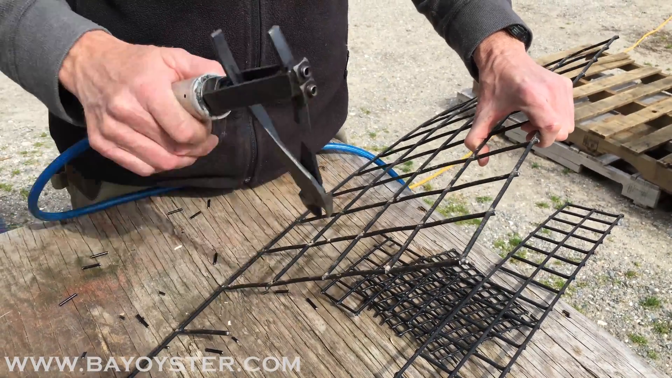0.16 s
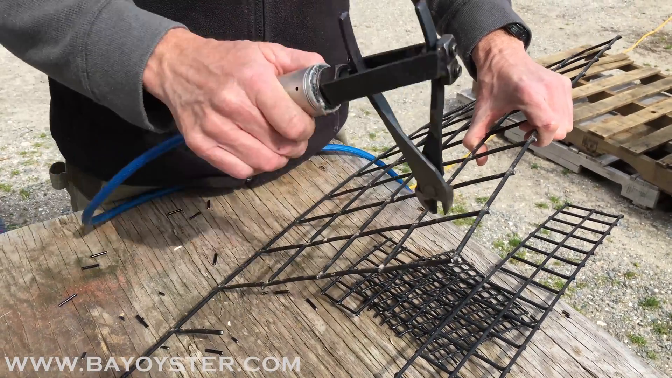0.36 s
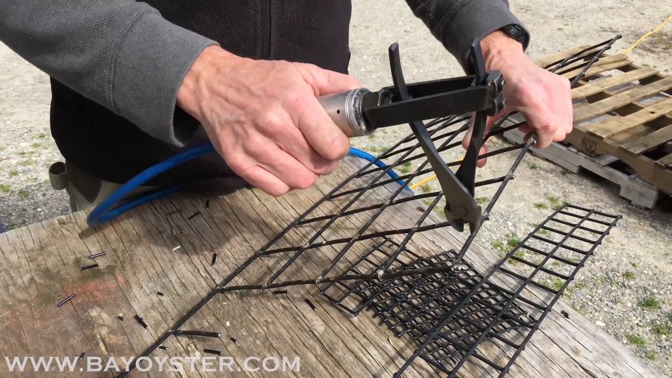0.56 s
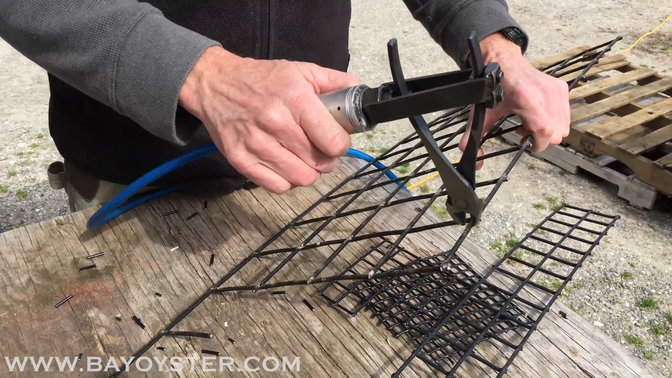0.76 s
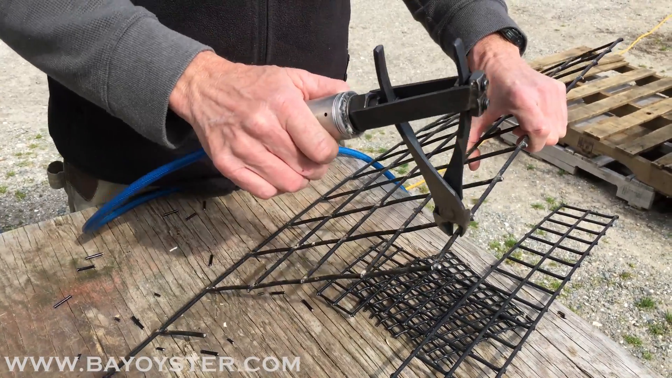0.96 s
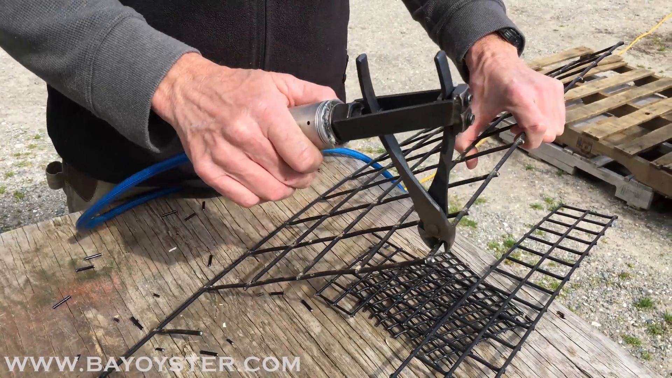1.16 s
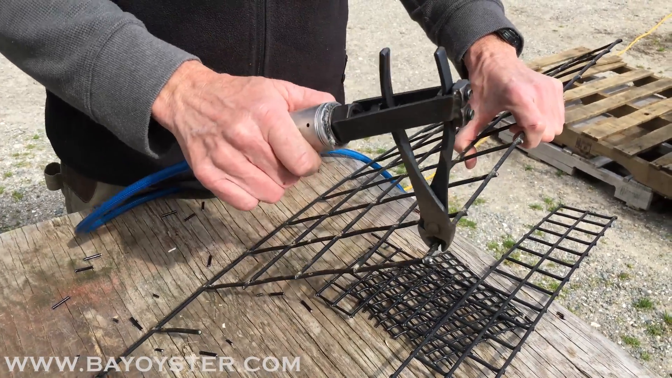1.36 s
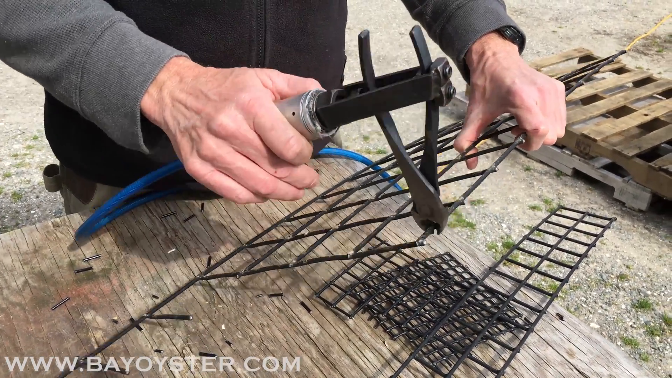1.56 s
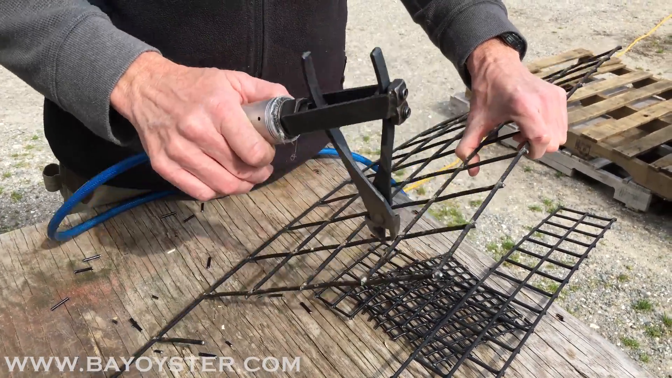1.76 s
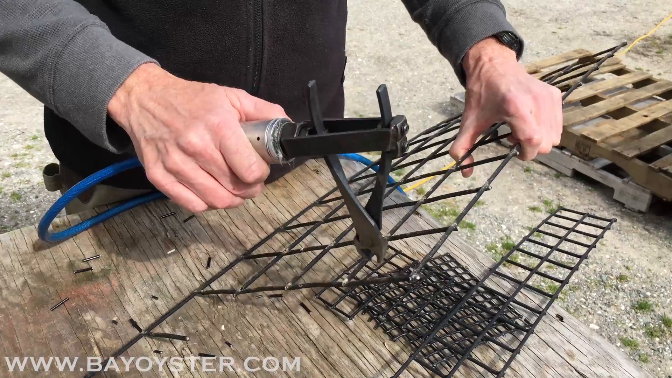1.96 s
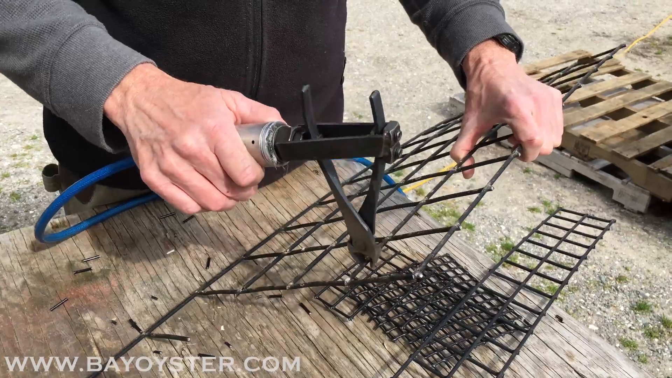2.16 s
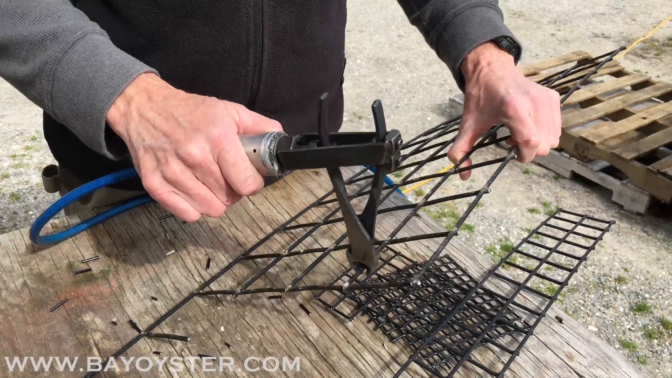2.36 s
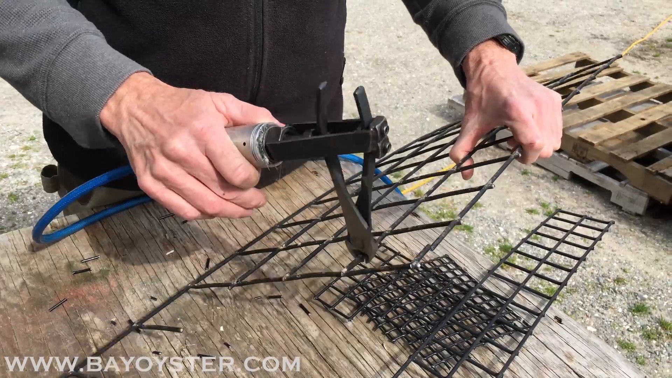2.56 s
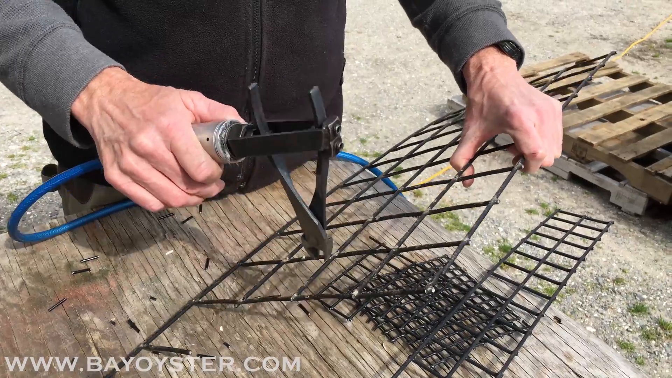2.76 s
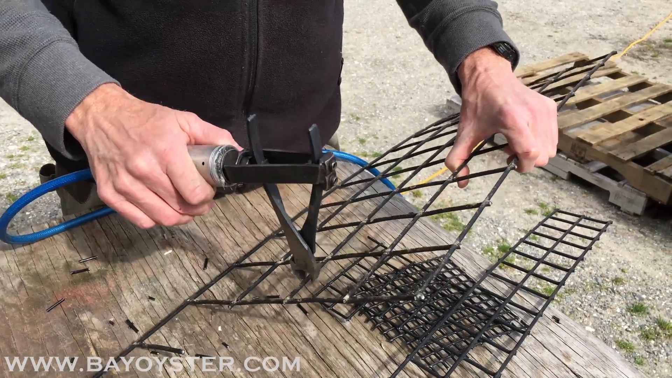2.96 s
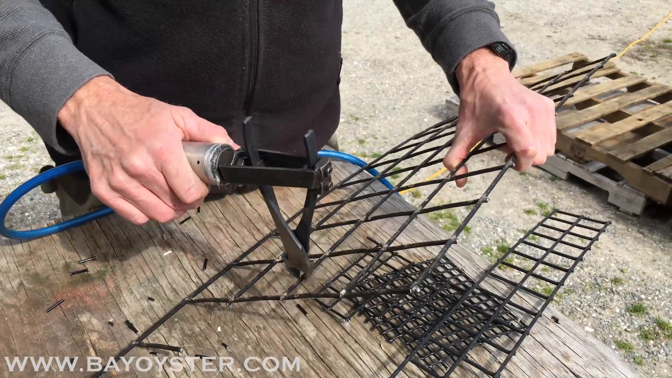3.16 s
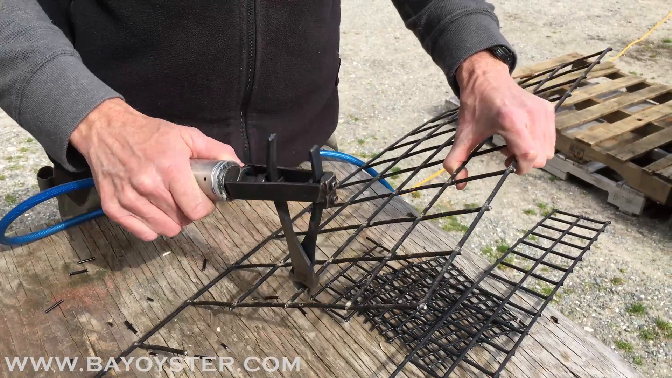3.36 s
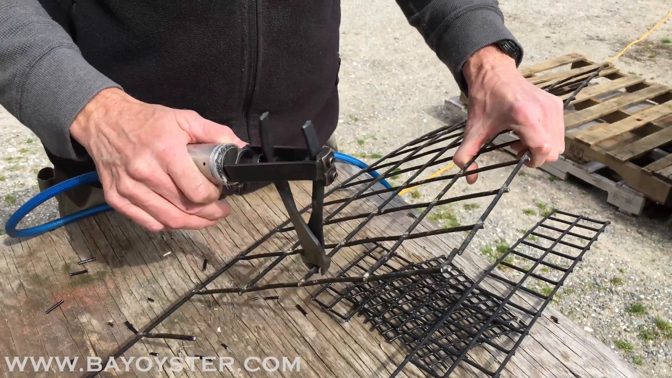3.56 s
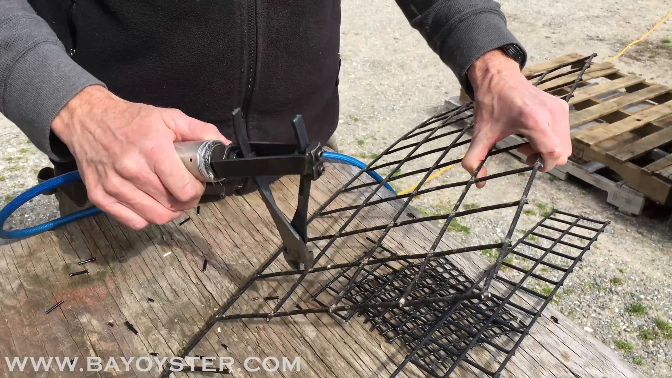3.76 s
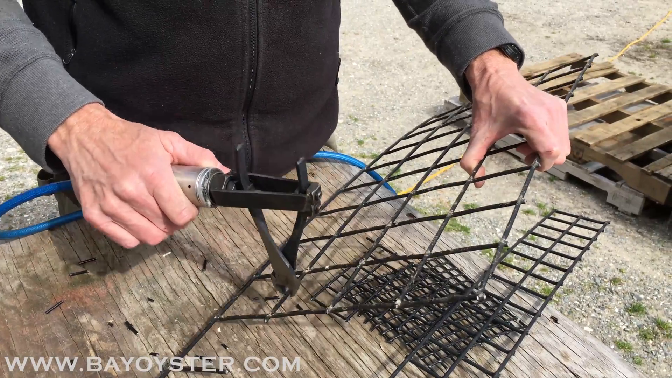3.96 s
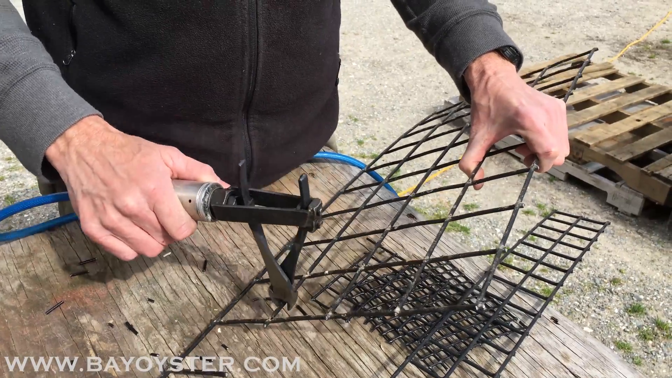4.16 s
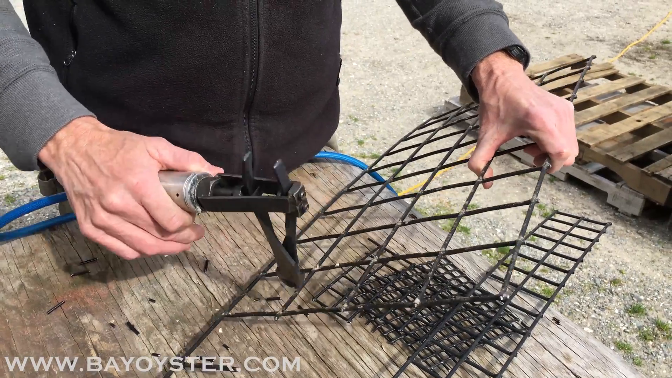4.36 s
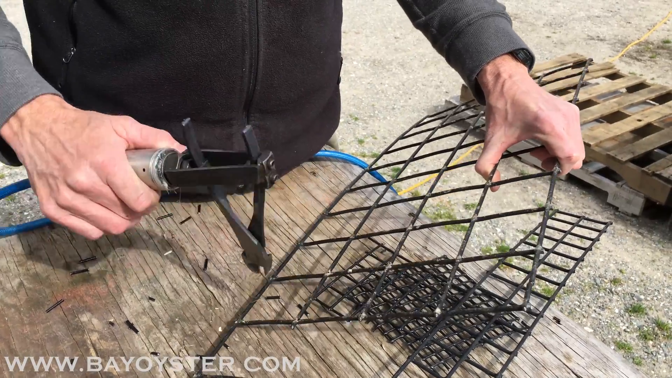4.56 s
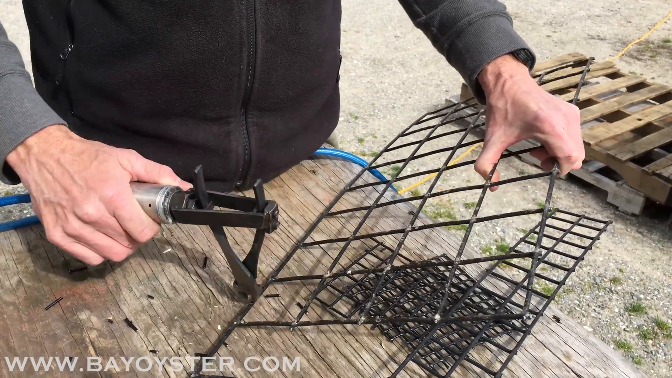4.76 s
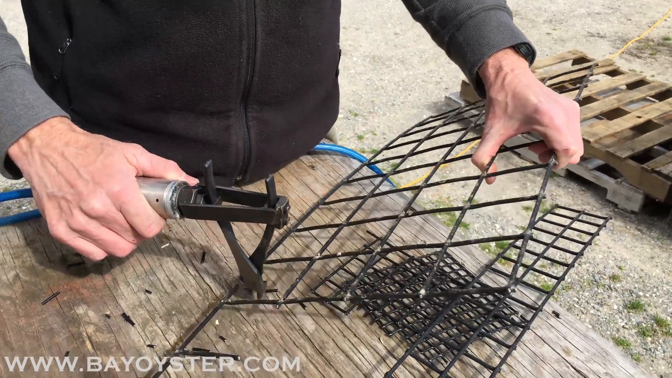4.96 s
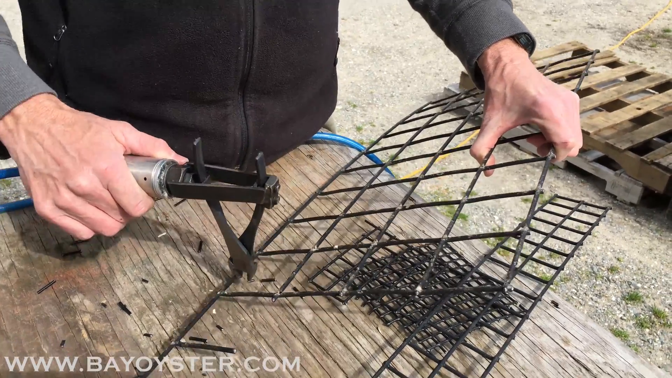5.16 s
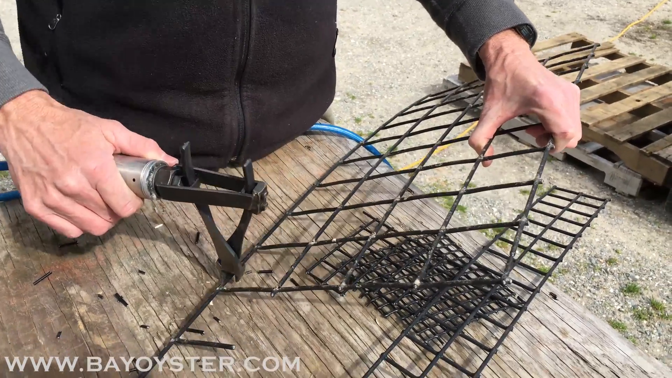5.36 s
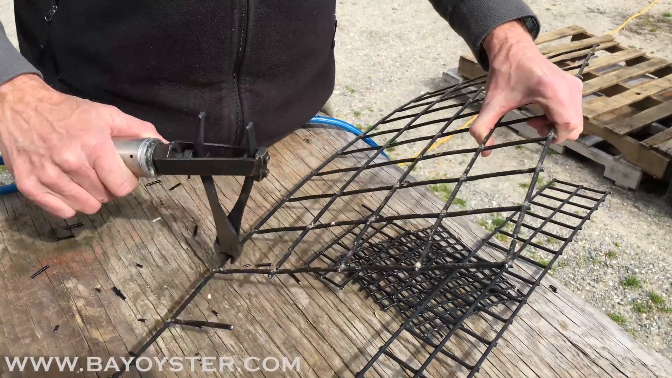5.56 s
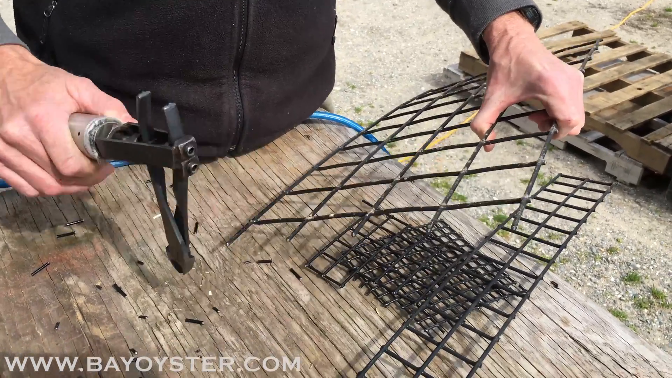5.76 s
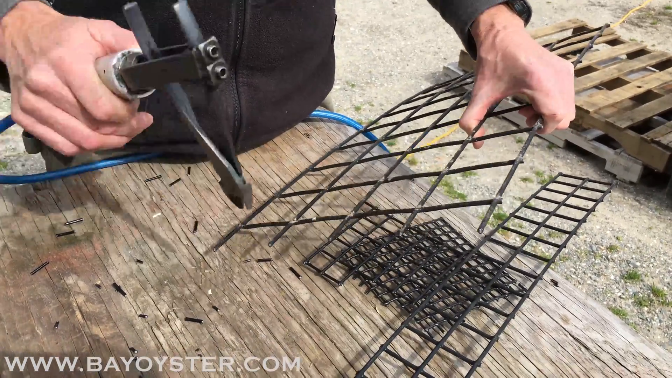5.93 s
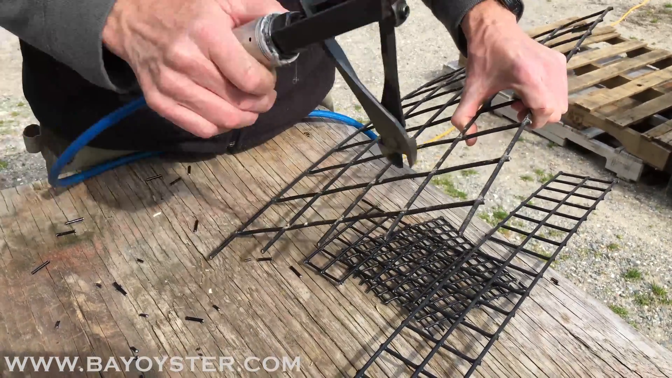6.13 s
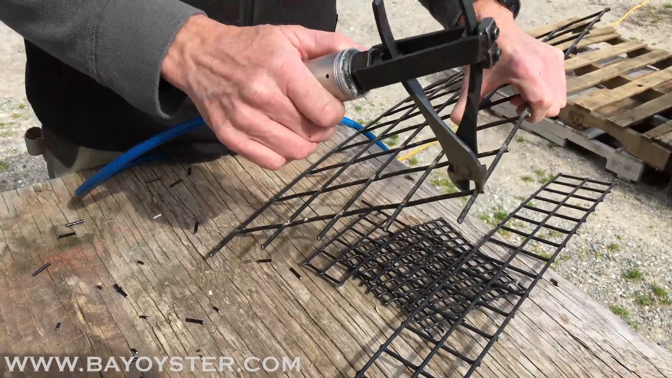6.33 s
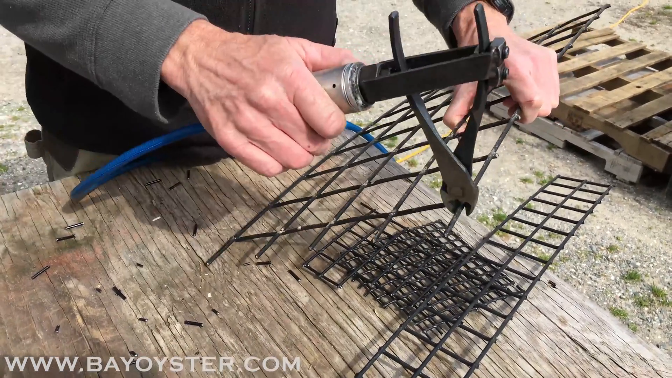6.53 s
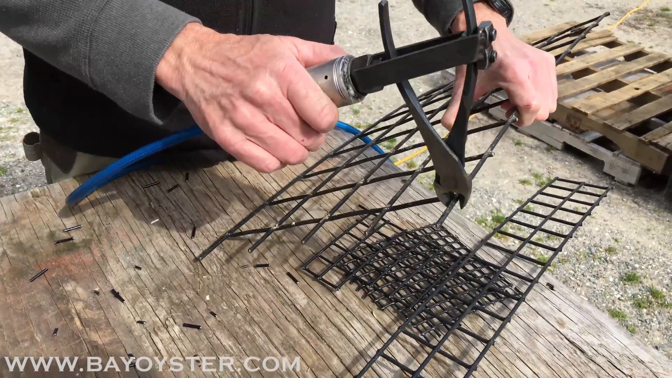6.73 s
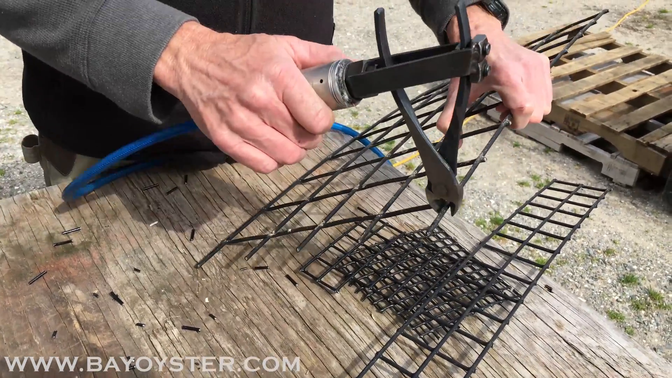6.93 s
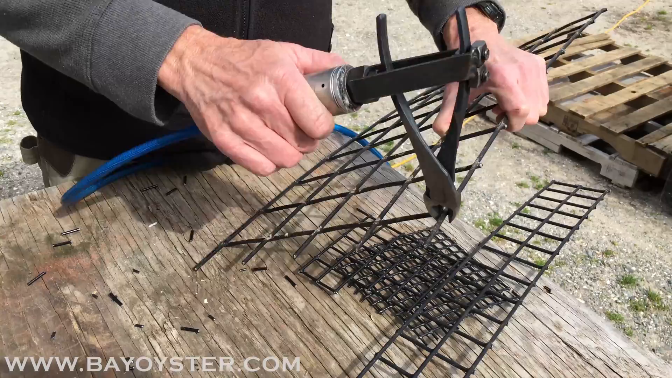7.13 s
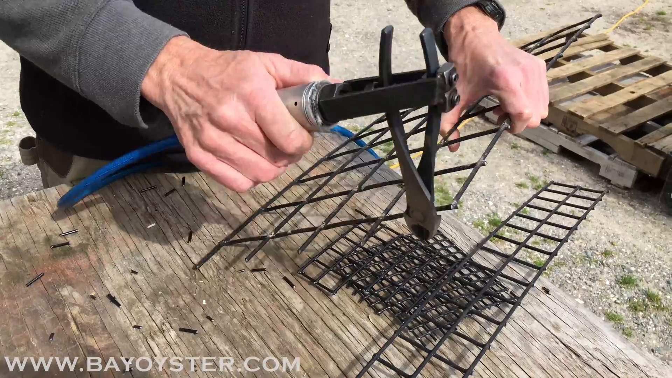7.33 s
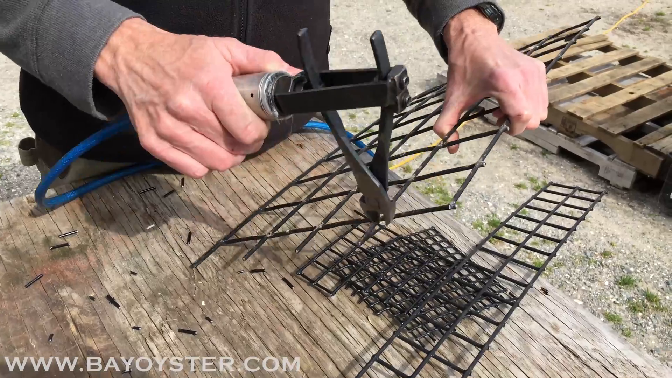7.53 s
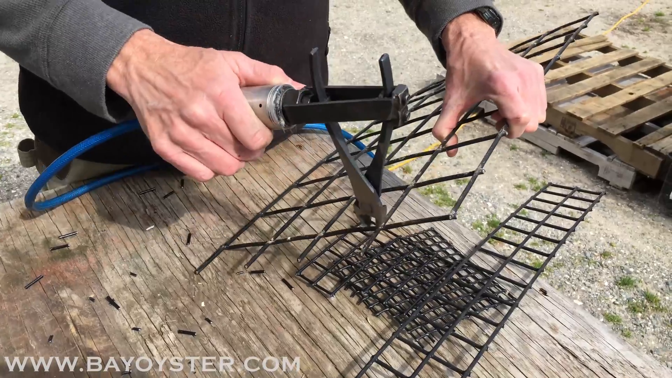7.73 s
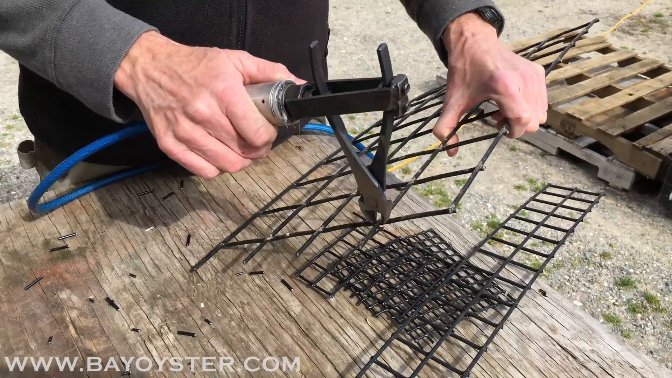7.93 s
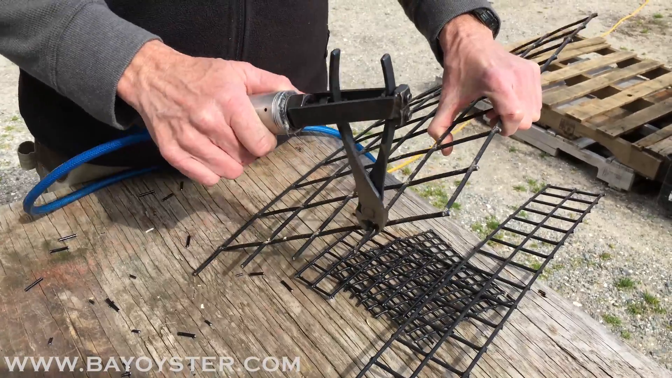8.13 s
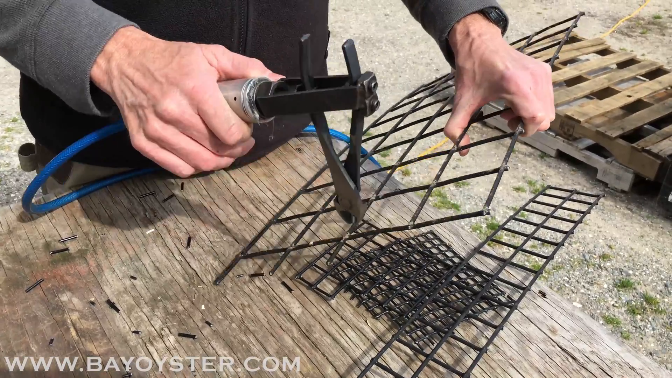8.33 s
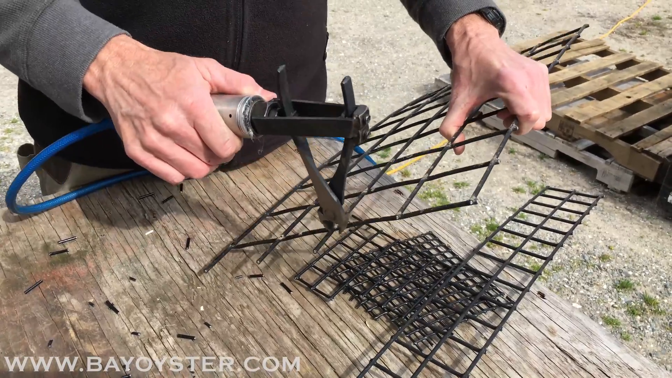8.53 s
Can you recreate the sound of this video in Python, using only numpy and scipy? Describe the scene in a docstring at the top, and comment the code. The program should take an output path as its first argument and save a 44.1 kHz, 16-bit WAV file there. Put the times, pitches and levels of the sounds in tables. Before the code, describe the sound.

Seven loud metallic bite-and-snap cuts, each answered by a short pneumatic blast, with light wire mesh clinks on wood and a faint distant engine.

```python
"""Outdoors, close by: air-powered cutters finish a vent, air seeps from the tool, wire squeaks in its jaws.
Then seven wires of a steel mesh are cut: ticks, jaws bite (noise, clamped modes), wire snaps, steel rings.
After each cut the jaws clatter open, the cylinder blasts and drains (coloured noise), the piston clicks home.
Between cuts the mesh bounces, shivers and drags on a wooden bench (modes, noise) and air hisses faintly.
Throughout: open air and low rumble (coloured noise), a distant engine (wavering harmonics)."""
import sys
import numpy as np
from scipy import signal
from scipy.fft import rfft, irfft
from scipy.io import wavfile
from scipy.ndimage import uniform_filter1d, minimum_filter1d

SR = 44100
rng = np.random.default_rng(int(sys.argv[2]) if len(sys.argv) > 2 else 0)


def to_wav(s):
    """Save 16-bit WAV."""
    ch = np.atleast_2d(s).T  # columns
    pcm = np.round(np.clip(ch, -1, 1) * 32767)  # PCM
    wavfile.write(sys.argv[1], SR, pcm.astype(np.int16))


N = 383537  # samples

# Table levels are relative; the functions add fixed trims.
# jaws hit the wire: (time [s], crack [dB], jaw clank [dB], thump [dB])
BITES = [(1.5185, -3.5, -20.5, -24), (2.5351, -4, -12, -29), (3.5235, 0.5, -38, -19),
         (4.3743, -0.5, -18.5, -22), (5.7375, 2.5, -12.5, -16.5), (7.346, 0, -14, -29),
         (8.304, -4, -9.5, -25)]
# wire parts: (time [s], crack [dB], ring [dB], thump [dB])
SNAPS = [(1.5576, -3.5, -17, -21), (2.5718, -3.5, -20.5, -22), (3.559, -3, -16.5, -22.5),
         (4.4113, -5, -13, -23), (5.7758, -4, -15, -15), (7.3881, -4.5, -15, -28),
         (8.3462, -5.5, -18.5, -25.5)]
# trigger released: (time [s], air blast [dB], jaw clatter [dB], thump [dB], piston stroke [dB])
VENTS = [(-.035, -19.5, -34, -21, -26), (1.654, -6, -1.5, -11, -22.5), (2.669, -7, -7.5, 1.5, -20.5),
         (3.655, -5.5, -5.5, -6, -19), (4.494, -8.5, -5.5, -7.5, -19.5), (5.884, -5, -6.5, -4, -18),
         (7.5, -5.5, 1, 2.5, -19.5), (8.428, -8, -7.5, -0.5, -21.5)]
# wire rubs in the jaws: (time [s], length [s], level [dB], tilt [dB/octave])
SQUEAKS = [(0.643, .14, -71.5, 11.5), (6.959, .21, -58.5, -5.5)]
# mesh lands: (time [s], clink [dB], grid pitch [Hz], boards [dB], wire tick [dB],
#              bounces [count, rounded; -1 = shiver only], gap between contacts [s])
LANDINGS = [(0.85, -53, 593, -49.5, -51, 0, 0), (0.905, -31, 984, -33, -37, 2, .027),
            (1.061, -44, 643, -41, -52.5, 2, .028), (1.826, -38, 643, -46, -46, 3.5, .0245),
            (2.068, -39, 791, -35, -37.5, 0, 0), (2.124, -45.5, 582, -40, -42.5, -0.5, 0),
            (2.276, -59.5, 654, -43.5, -69, 0.5, 0), (2.356, -53, 640, -43.5, -55, 0.5, .022),
            (2.852, -36, 623, -44.5, -44.5, 4, .0245), (3.054, -36, 639, -34.5, -41, 1, .025),
            (3.841, -31.5, 876.4, -40, -43.5, 3.5, .029), (4.05, -35.5, 850, -36.5, -70, 3, .03),
            (4.582, -38.5, 992, -39, -28.5, 0, 0), (4.756, -38.5, 950, -56, -60, 0.5, .035),
            (4.891, -44, 904, -40.5, -55.5, 1.5, .012), (4.967, -48, 980, -45, -58.5, 1.5, .038),
            (5.394, -40.5, 885, -38, -67, 0, 0), (5.853, -26, 876, -39, -45.5, -0.5, 0),
            (5.861, -24, 1051, -25, -12, -1, 0), (6.105, -33, 620, -28.5, -31, -0.5, 0),
            (6.723, -54, 598, -40, -49.5, 0.5, 0), (7.139, -73.5, 588, -48.5, -51.5, 0, 0),
            (7.185, -75, 588, -58.5, -56, 0, 0), (7.698, -42, 880, -71.5, -53.5, 0, 0),
            (7.715, -40.5, 937, -68, -36, 1.5, .024), (7.777, -49, 1020, -69, -54, 2.5, .037),
            (7.97, -59, 1020, -66, -62.5, 1.5, .011), (8.478, -11, 721, -43.5, -18, 1, 0),
            (8.612, -42.5, 642.3, -76, -81.5, -0.5, 0), (8.654, -49.5, 1124, -61.5, -51, 2, .012)]
# mesh dragged over the boards: (time [s], scrape [dB], boards [dB], length [s])
DRAGS = [(0.681, -56, -43.5, 0.073), (1.361, -64, -47, 0.055), (3.304, -50.5, -46, 0.0384),
         (3.434, -50, -44, 0.047), (4.618, -35, -40.5, 0.056), (5.974, -29.5, -33, 0.2),
         (6.168, -53, -43, .19), (7.742, -67, -62, .24), (8.243, -71, -42.5, .055)]
# air seeps past the valve: (start [s], end [s], level [dB])
LEAKS = [(0.098, 0.778, -69), (2.237, 2.412, -66.5), (3.105, 3.43, -68), (3.977, 4.199, -69.5),
         (4.713, 5.047, -68.5), (6.05, 6.669, -68), (7.979, 8.156, -70)]
# low rumble swells and sinks: (time [s], level [dB])
RUMBLE_LEVEL = [(0.0, -67), (1.5, -52), (1.94, -60.5), (2.57, -48), (2.98, -58.5), (3.51, -47.5),
                (3.85, -55.5), (4.43, -41.5), (4.6, -55), (5.52, -55), (5.72, -51), (6.66, -51.5),
                (6.85, -57.5), (7.46, -53.5), (7.68, -68), (7.99, -62.5), (8.31, -50.5), (8.7, -70)]
# distant engine: (time [s], firing rate [Hz], level [dB])
ENGINE = [(0, 120.7, -67), (.8, 120.7, -55.5), (1.9, 117.4, -55), (2.302, 117.4, -52), (3.299, 115.7, -50),
          (4.3, 112, -49), (4.799, 101.9, -55), (5.3, 112.3, -46.5), (6.499, 116.1, -49),
          (7.1, 109.4, -60.5), (7.751, 103.6, -50.5), (7.95, 104.5, -49), (8.118, 109, -35.5),
          (8.28, 113.9, -43), (8.7, 119, -60.5)]

# Modes: (frequency [Hz], level [dB], t60 [s])
# jaws clamped on the wire
CLAMPED_MODES = [(1715, -4, 0.019), (2050, -0.5, 0.027), (5800, -10.5, 0.065), (8210, -2.5, 0.02)]
# cutter steel, ringing free
STEEL_MODES = [(1654, -18, 0.083), (1892.6, -10.5, 0.038), (1940, -2, 0.092), (2027, -15.5, .05),
               (4230, -25, 0.059), (5470, -18, 0.071), (6340, -13, 0.086), (7639, -24.5, .072),
               (8974, -21, .079), (9450, -16.5, 0.074), (12310, -15, .058)]
# cylinder and handles
HOUSING_MODES = [(438, -1, .07), (563.7, 1, 0.045), (895.4, 0.5, 0.091), (1039.7, -3.5, 0.055),
                 (1448, -7.5, .09), (2080, -2.5, 0.041), (3235, -4.5, 0.086), (4280, -4, .08),
                 (5250, -4, 0.088), (5800, -8, 0.17), (6100, -2.5, .13), (6640, -3.5, .13), (9330, -5, .1),
                 (11140, -4, 0.11), (12594, -8, 0.11)]
# mesh lying on the bench
MESH_MODES = [(960, -0.5, .045), (1348, -20, 0.027), (1690, -1.5, 0.029), (2176, -6, 0.042),
              (2456, -7, 0.024), (3453, -8, 0.021)]
# bench boards
BOARD_MODES = [(145.7, -5, 0.11), (213.6, 4, 0.12), (273.5, -4, 0.03), (333, -15.5, 0.02)]
# tones of the squeak: (frequency [Hz], level [dB])
SQUEAK_TONES = [(1723, -9), (2277, -14), (3320, -12), (6690, -19.5)]

# Noise spectra, shape only: (frequency [Hz], density [dB per Hz])
# valve, linkage and jaw bite
BITE_COLOUR = [(60, -9), (220, 3.5), (550, 1.5), (1150, -10.5), (1900, 5), (2900, -7.5), (3600, -2),
               (8200, -0.5), (10400, -4), (11200, 1), (13000, -3.5), (16000, -3)]
# wire snap
SNAP_COLOUR = [(60, 1), (220, 10), (360, 3.5), (500, 5.5), (800, -4), (2000, 1.5), (3000, -4.5), (4300, 0),
               (5400, 3), (7500, -0.5), (12300, 2.5), (13600, -5.5), (16000, -8.5)]
# jaws opening
CLATTER_COLOUR = [(60, -3.5), (230, 10), (360, 3.5), (480, 8), (750, 4), (2200, 5), (3500, -2.5),
                  (6500, -10.5), (10000, -15), (16000, -18)]
# air blast
AIR_COLOUR = [(100, -15.5), (600, -12), (2100, -6.5), (2900, -9.5), (4400, -1.5), (4900, -6), (5600, 2),
              (6500, 1.5), (7600, -4), (9100, 1), (10400, -8), (11200, -1.5), (12500, -4), (16000, -15)]
# air pushed out by the piston
DRAIN_COLOUR = [(300, -16.5), (650, -8), (950, -10.5), (1900, 0), (3000, -3), (4400, -0.5), (4850, -4.5),
                (5600, 4), (6500, 1), (7800, -0.5), (9100, -0.5), (10400, -14), (12000, -7), (16000, -22.5)]
# piston click
PISTON_COLOUR = [(300, -14.5), (900, -4), (1900, 9), (3000, -5), (9000, -1), (16000, -9)]
# mesh rubbing on wood
SCRAPE_COLOUR = [(150, -21), (450, -2), (680, 8.5), (1900, 2.5), (3500, -10), (6000, -22.5), (15000, -38)]
# wire tick
TICK_COLOUR = [(500, -7), (3000, 3.5), (6000, -0.5), (10000, -10), (16000, -25.5)]
# planks
PLANK_COLOUR = [(60, -11), (150, 0.5), (240, -1), (320, -5.5), (450, -8.5), (650, -10), (1000, -27),
                (4000, -55)]
# seeping air
HISS_COLOUR = [(600, 1), (2500, 2), (6500, -2.5), (9500, -2), (10500, -9.5), (12500, -4.5), (16000, -10.5)]
# open air
YARD_COLOUR = [(120, -36), (200, -12), (360, 0.5), (482, -15), (569, -6), (749, -14), (1320, -16),
               (1530, -19.5), (1710, -22), (3620, -33), (12800, -37), (16000, -52)]
# low rumble
RUMBLE_COLOUR = [(20, -27), (40, -10), (55, 0), (80, -2.5), (115, -3.5), (160, -18.5), (260, -26.5),
                 (600, -66)]

# each contact is softer; the last falls to these levels or by the least loss, whichever is lower
LAST_CLINK_DB, LAST_TICK_DB, LEAST_LOSS_DB, BOARDS_LOSS_DB = -49, -60, 4, 7
BOUNCE_SCATTER_DB = 2
GRID_RING_CYCLES = 38.6  # swings per 60 dB of decay: high spans ring less long
# shiver after a landing, relative to its boards level
SHIVER_SCRAPE_DB, SHIVER_BOARDS_DB, SHIVER_S = -20.5, -11, 0.12
# each bite jolts the mesh
JOLT_SCRAPE_DB, JOLT_BOARDS_DB, JOLT_DELAY_S, JOLT_S = -26.5, -31.5, 0.01, 0.046


def undb(db):
    """Decibels to gain."""
    return 10 ** (np.asarray(db) / 20)


def clock(seconds):
    """Time axis of one event [s]."""
    return np.arange(int(seconds * SR)) / SR


def add(out, start_s, x):
    """Mix x into out at start_s; clip whatever lies outside."""
    i = int(start_s * SR)
    x, i = x[max(-i, 0):], max(i, 0)
    out[i:i + len(x)] += x[:max(len(out) - i, 0)]


def fade(t, t60_s):
    """Exponential decay from t = 0, silent before."""
    return (t >= 0) * undb(-60 * np.maximum(t, 0) / t60_s)


def colour(x, points, size=4096):
    """Minimum-phase filter through (Hz, dB) points that keeps the power of white noise."""
    hz, db = np.transpose(points)
    f = np.maximum(np.fft.rfftfreq(size, 1 / SR), 1)
    gain = undb(np.interp(np.log(f), np.log(hz), db))
    cepstrum = irfft(np.log(gain))
    # fold the cepstrum to make the response causal
    cepstrum[1:size // 2] *= 2
    cepstrum[size // 2 + 1:] = 0
    response = irfft(np.exp(rfft(cepstrum)))
    response /= np.linalg.norm(response)
    return signal.fftconvolve(x, response)[:len(x)]


def burst(envelope, points):
    """White noise under an envelope, then coloured."""
    return colour(envelope * rng.standard_normal(len(envelope)), points)


def ring(t, modes, detune, scatter_db):
    """Struck modes; each blow lands elsewhere and shifts their sizes, signs and pitches."""
    out = np.zeros(len(t))
    for hz, db, t60_s in modes:
        size, shift, sign = rng.standard_normal(3)
        swing = np.sin(2 * np.pi * hz * (1 + detune * shift) * t)
        out += np.sign(sign) * undb(db + scatter_db * size) * fade(t, t60_s) * swing
    return out


def thump(t, start_hz, end_hz, glide_s, swell_s):
    """Low thump: a few low swings that slow down as they die."""
    cycles = end_hz * t + (start_hz - end_hz) * glide_s * (1 - np.exp(-t / glide_s))
    return t / swell_s * np.exp(1 - t / swell_s) * np.sin(2 * np.pi * cycles)


def walk(rate_hz):
    """Random drift, a new target rate_hz times a second, with a spread just under 1."""
    k = int(SR / rate_hz)
    return uniform_filter1d(np.repeat(rng.standard_normal(N // k + 1), k), k)[:N]


def bites():
    """The valve opens and the linkage ticks; the jaws hit the wire and hit again as they sink in."""
    out, t = np.zeros(N), clock(0.2)
    lead_s = 0.026
    for s, crack_db, clank_db, thump_db in BITES:
        tick_times = np.arange(3) * 0.0096 + rng.uniform(0, 0.0048, 3)
        ticks = sum(fade(t - at, 0.012) for at in tick_times)
        valve = ticks + 0.18 * (t < lead_s)
        add(out, s - lead_s, undb(-34) * burst(valve, BITE_COLOUR))

        crack = fade(t, 0.011) + 0.6 * fade(t - 0.003, 0.019) + 0.11 * fade(t, 0.1)
        add(out, s, undb(crack_db + 1.5) * burst(crack, BITE_COLOUR))
        clank = ring(t, CLAMPED_MODES, detune=0.011, scatter_db=1.5)
        add(out, s + 0.002, undb(clank_db + 8.5) * clank)
        low_thump = thump(t, start_hz=274.5, end_hz=65, glide_s=0.0055, swell_s=0.0097)
        add(out, s, undb(thump_db + 7.5) * low_thump)
    return out


def snaps():
    """The wire parts, the jaws slam shut and the free steel rings, with a low thump."""
    out, t = np.zeros(N), clock(0.43)
    for s, crack_db, ring_db, thump_db in SNAPS:
        crack = fade(t, 0.014) + 0.5 * fade(t, 0.059) + 0.022 * fade(t, 0.32)
        add(out, s, undb(crack_db + 2.5) * burst(crack, SNAP_COLOUR))
        steel = ring(t, STEEL_MODES, detune=0.0022, scatter_db=2.9)
        add(out, s + 0.0047, undb(ring_db + 12.5) * steel)
        low_thump = thump(t, start_hz=319, end_hz=46, glide_s=0.0042, swell_s=0.007)
        add(out, s, undb(thump_db + 18) * low_thump)
    return out


def vents():
    """The jaws clatter open, the cylinder dumps its air, the piston pushes out the rest and clicks home."""
    out, t = np.zeros(N), clock(0.25)
    stroke_s, choked_s = 0.1255, 0.026
    for s, air_db, clatter_db, thump_db, stroke_db in VENTS:
        # flow holds while the port is choked, then falls with the pressure; the jet sputters
        sputter = undb(1.5 * walk(250)[:len(t)])
        blast = np.minimum(t / 0.0014, 1) * fade(np.maximum(t - choked_s, 0), 0.1) * sputter
        add(out, s, undb(air_db - 2.5) * burst(blast, AIR_COLOUR))
        stroke_end = fade(np.maximum(t - stroke_s + 0.0071, 0), 0.11)
        drain = np.minimum(t / 0.019, 1) * fade(t, 0.43) * stroke_end * sputter
        add(out, s, undb(stroke_db) * burst(drain, DRAIN_COLOUR))

        knocks = np.zeros(len(t))
        for k in range(3):
            at = 0.002 + k * 0.0073 + rng.uniform(0, 0.0017)
            knocks += undb(-1.5 * k) * fade(t - at, 0.035)
        add(out, s, undb(clatter_db) * burst(knocks, CLATTER_COLOUR))
        housing = ring(t, HOUSING_MODES, detune=0.002, scatter_db=2.5)
        add(out, s + 0.004, undb(clatter_db - 11.5) * housing)
        low_thump = thump(t, start_hz=292.77, end_hz=45, glide_s=0.005, swell_s=0.0085)
        add(out, s, undb(thump_db) * low_thump)
        add(out, s + stroke_s, undb(stroke_db - 3) * burst(fade(t, 0.0255), PISTON_COLOUR))
    return out


def squeak():
    """The wire rubs faintly and unevenly in the jaws as they are lined up: tones sharing one jitter."""
    out, lowest_hz = np.zeros(N), SQUEAK_TONES[0][0]
    for s, length_s, level_db, tilt_db in SQUEAKS:
        size = len(clock(length_s))
        phase_per_hz = 2 * np.pi * np.cumsum(1 + 0.02 * walk(300)[:size]) / SR
        grip = np.hanning(size) * undb(level_db + 5 * walk(120)[:size])
        tones = np.zeros(size)
        for hz, db in SQUEAK_TONES:
            tones += undb(db + tilt_db * np.log2(hz / lowest_hz)) * np.sin(hz * phase_per_hz)
        add(out, s, grip * tones)
    return out


def mesh():
    """The mesh lands, bounces and shivers to rest; bites jolt it and it is dragged at times."""
    out = np.zeros(N)
    for s, clink_db, grid_hz, boards_db, tick_db, bounces, gap_s in LANDINGS:
        add(out, s + 0.004, shiver(boards_db + SHIVER_SCRAPE_DB, boards_db + SHIVER_BOARDS_DB, SHIVER_S))
        clink_loss_db = max(clink_db - LAST_CLINK_DB, LEAST_LOSS_DB)
        tick_loss_db = max(tick_db - LAST_TICK_DB, LEAST_LOSS_DB)
        # spent: share of the loss so far, 0 at the first contact, 1 at the last
        for k, spent in enumerate(np.linspace(0, 1, round(bounces) + 1)):
            contact = knock(clink_db - spent * clink_loss_db, grid_hz,
                            boards_db - spent * BOARDS_LOSS_DB, tick_db - spent * tick_loss_db)
            scatter = undb(spent * BOUNCE_SCATTER_DB * rng.standard_normal())
            add(out, s + k * gap_s, scatter * contact)
    for s, *_ in BITES:
        add(out, s + JOLT_DELAY_S, shiver(JOLT_SCRAPE_DB, JOLT_BOARDS_DB, JOLT_S))
    for s, scrape_db, boards_db, length_s in DRAGS:
        add(out, s, shiver(scrape_db, boards_db, length_s))
    return out


def knock(clink_db, grid_hz, boards_db, tick_db):
    """One contact: a tick, a clink of the grid, pitched by how it lies, and a dull answer from the wood."""
    t = clock(0.25)
    t60_s = GRID_RING_CYCLES / grid_hz
    grid_modes = [(grid_hz, 5, t60_s), (1.17 * grid_hz, -3, 0.54 * t60_s), (1.1 * grid_hz, -4, 0.53 * t60_s)]
    grid = ring(t, grid_modes, detune=0.012, scatter_db=1.5)
    wires = ring(t, MESH_MODES, detune=0.04, scatter_db=2.5)
    rasp = burst(0.75 * fade(t, 0.032) + 0.28 * fade(t, 0.17), SCRAPE_COLOUR)
    clink = grid + wires + rasp
    boards = ring(t, BOARD_MODES, detune=0.08, scatter_db=2)
    wood = boards + burst(1.2 * fade(t, 0.11), PLANK_COLOUR)
    tick = burst(fade(t, 0.022), TICK_COLOUR)
    return undb(clink_db) * clink + undb(boards_db) * wood + undb(tick_db) * tick


def shiver(scrape_db, boards_db, length_s):
    """Uneven small contacts weaken over a light drag of mesh on wood."""
    t = clock(length_s + 0.066)
    rub = 0.35 * np.minimum(t / 0.0069, 1) * np.clip(1 - t / length_s, 0, 1) ** 0.5
    for when, soft in rng.random((int(length_s * 70) + 1, 2)):  # about 70 contacts per second
        rub += undb(4 - 13 * soft - 9 * when) * fade(t - when * length_s, 0.028)
    return undb(scrape_db) * burst(rub, SCRAPE_COLOUR) + undb(boards_db) * burst(rub, PLANK_COLOUR)


def leaks():
    """A thin hiss of seeping air that comes and goes between cuts."""
    out = np.zeros(N)
    for start_s, end_s, db in LEAKS:
        gate = signal.windows.tukey(len(clock(end_s - start_s)), 0.25)
        add(out, start_s, undb(db) * burst(gate, HISS_COLOUR))
    return out


def yard():
    """Open-air noise, a low rumble and a distant engine: harmonics of a wavering firing rate."""
    t = np.arange(N) / SR
    air = undb(-60 + 0.18 * walk(2.8)) * burst(np.ones(N), YARD_COLOUR)
    rumble_db = np.interp(t, *np.transpose(RUMBLE_LEVEL)) + 7
    rumble = undb(rumble_db) * burst(np.ones(N), RUMBLE_COLOUR)

    s, hz, db = np.transpose(ENGINE)
    firing_hz = np.interp(t, s, hz) * (1 + 0.008 * walk(16))
    phase = 2 * np.pi * np.cumsum(firing_hz) / SR
    hum_gain = undb(np.interp(t, s, db) + 3 * walk(7.3))
    hum = hum_gain * (np.sin(phase) + undb(-21.5) * np.sin(2 * phase))
    third_harmonic = undb(-62 + 3 * walk(12)) * np.sin(3 * phase)
    return air + rumble + hum + third_harmonic


def scene():
    """All sources at one microphone."""
    return (bites() + snaps() + vents() + squeak() + mesh() + leaks() + yard())[None]


def gain_control(x, threshold_db, slope, hold_s, release_s):
    """Loud sound turns the gain down at once; it stays down for a moment, then creeps back."""
    power = uniform_filter1d(x ** 2, int(0.004 * SR))
    level_db = 10 * np.log10(np.maximum(power, 1e-12))
    size = 2 * int(hold_s * SR / 2) + 1
    wanted_db = np.minimum(threshold_db - level_db, 0) * slope
    held_db = minimum_filter1d(wanted_db, size, origin=size // 2)  # looks back over the hold
    pole = np.exp(-1 / (release_s * SR))
    released_db = signal.lfilter([1 - pole], [1, -pole], held_db)
    return x * undb(np.minimum(held_db, released_db))


def record(dry):
    """The recorder ducks loud sound, rounds the highest peaks and cuts the top."""
    ceiling, top_hz = 0.5224, 15700
    ducked = gain_control(dry, threshold_db=-17, slope=0.34, hold_s=0.16, release_s=0.064)
    rounded = ceiling * np.tanh(ducked / ceiling)
    low_pass = signal.ellip(8, 0.2, 70, top_hz, fs=SR, output="sos")
    return signal.sosfilt(low_pass, rounded)


dry = scene()
out = record(dry)
to_wav(out)
```